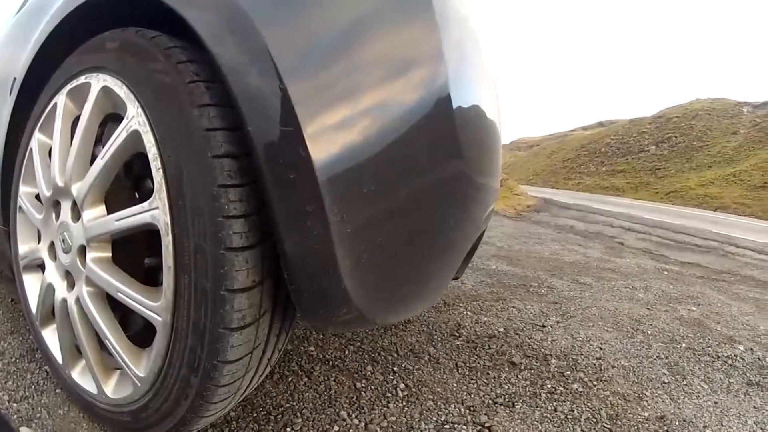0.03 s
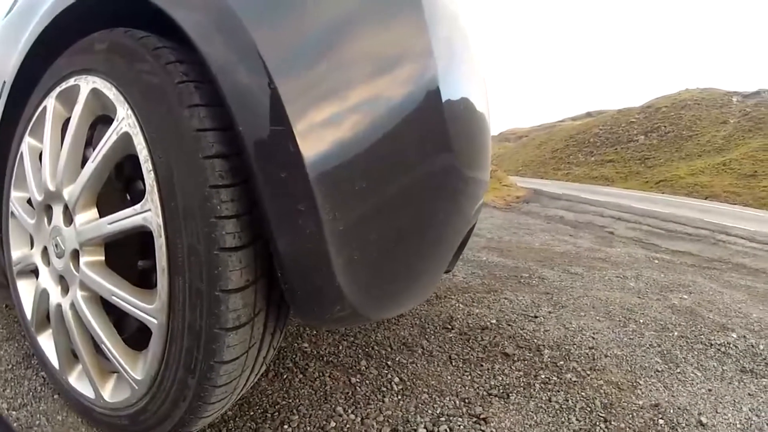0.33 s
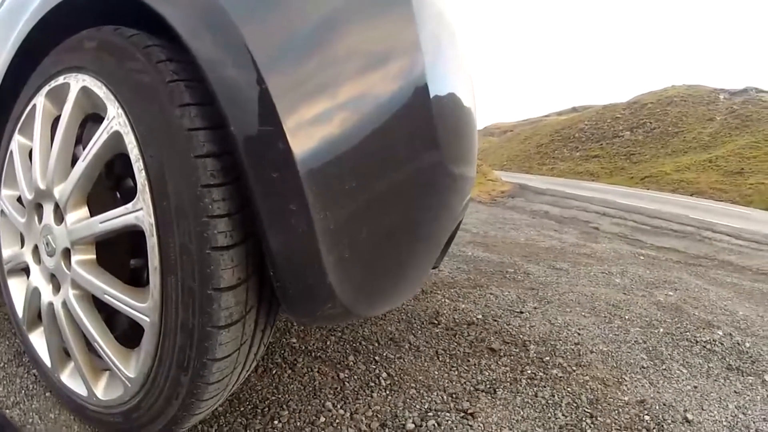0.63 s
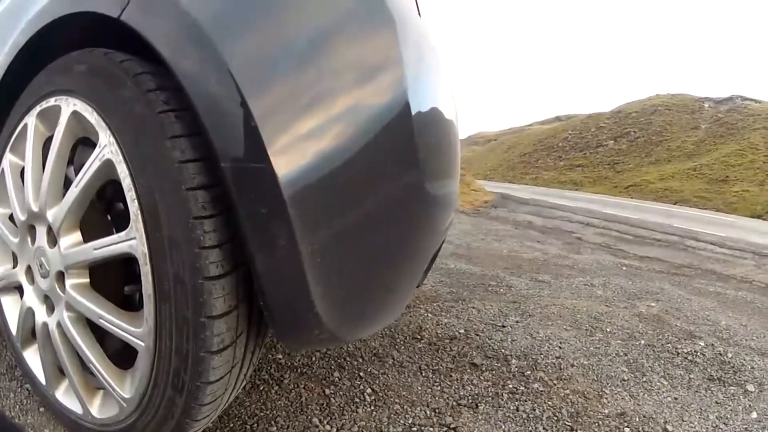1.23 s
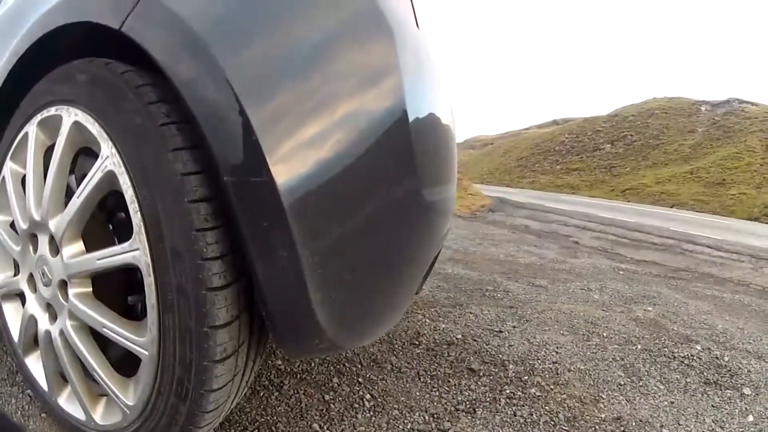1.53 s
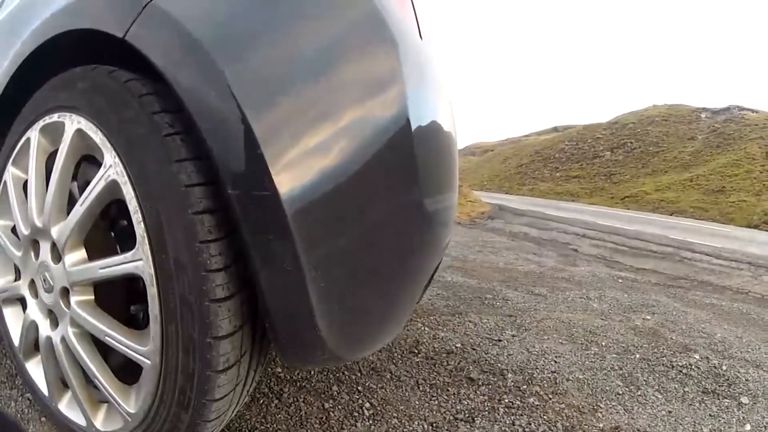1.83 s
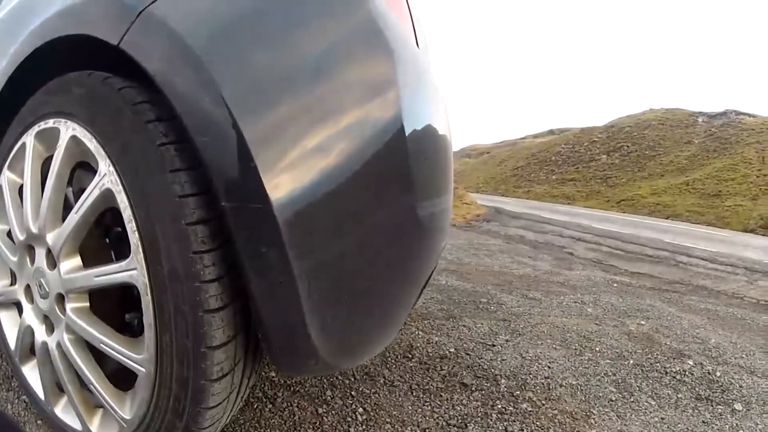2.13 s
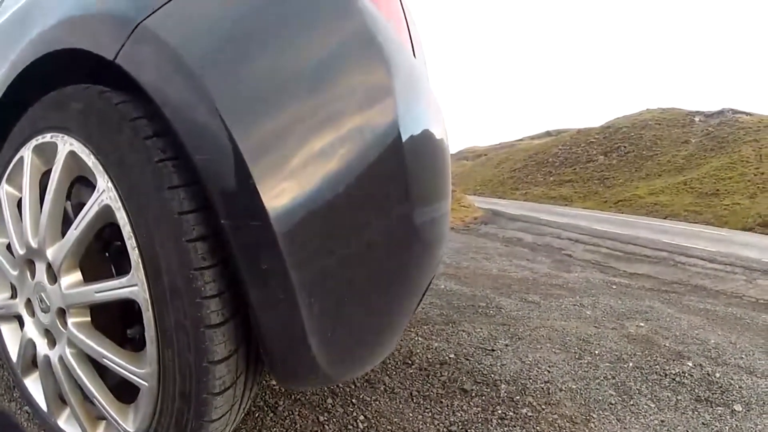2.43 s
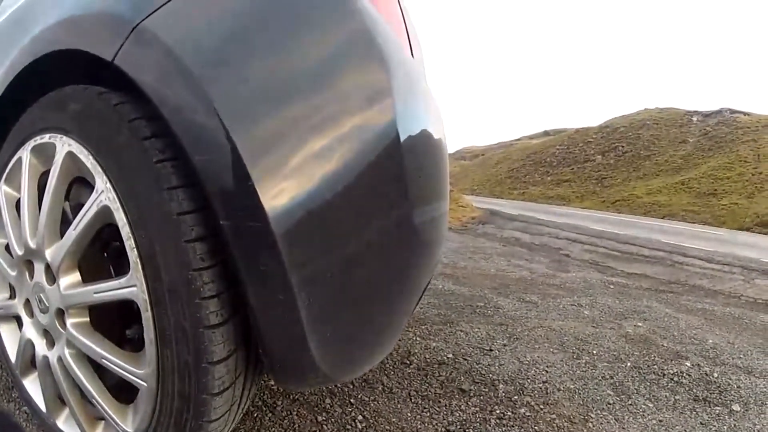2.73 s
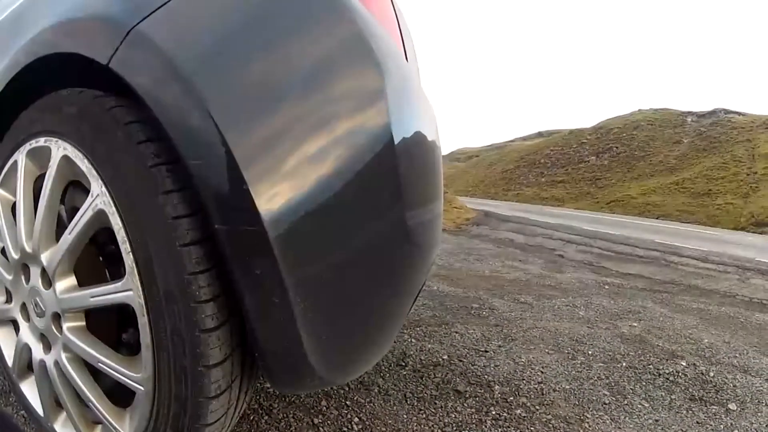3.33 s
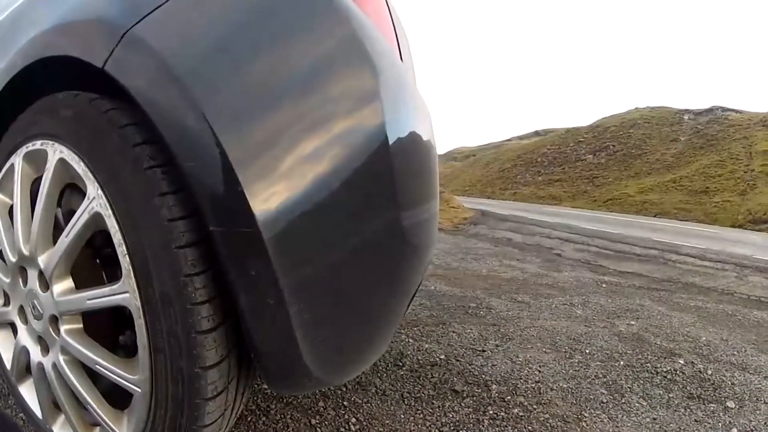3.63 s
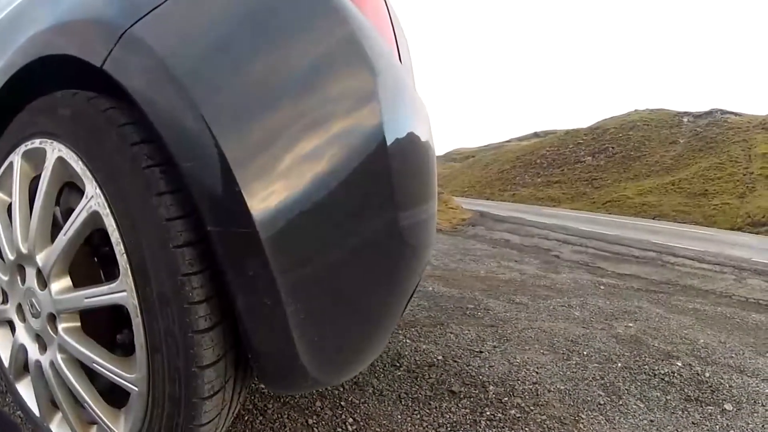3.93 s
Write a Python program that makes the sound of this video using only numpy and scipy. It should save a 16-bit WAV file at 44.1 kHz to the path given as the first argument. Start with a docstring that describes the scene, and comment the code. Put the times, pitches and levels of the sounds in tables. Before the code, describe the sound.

A car engine rumbles low and muffled, heard outdoors beside the rear wheel, with faint gravel snaps and two short handling rustles. It slows almost to idle, revs up, falls back with soft exhaust pops and starts rising again.

```python
"""A car creeps over gravel, heard from a cased camera beside its rear wheel.
The exhaust drones at the firing rate and burbles with uneven firings; something rubs the case.
Grit ticks and stones snap under the tyre, wind bumps once near 1 s, and a second rustle on the
case bites into a scrape. The engine sags almost to idle by 2.5 s, revs up to a peak at 3.25 s,
then pops softly as the throttle shuts. A last stab of throttle follows."""
import sys
import numpy as np
from scipy import signal
from scipy.fft import rfft, irfft, next_fast_len
from scipy.io import wavfile
from scipy.ndimage import uniform_filter1d, map_coordinates

SR = 44100
rng = np.random.default_rng(int(sys.argv[2]) if len(sys.argv) > 2 else 0)


def int16_out(signal):
    """Quantize to a 16-bit WAV file."""
    q = np.round(np.clip(np.atleast_2d(signal).T, -1, 1) * 32767)
    wavfile.write(sys.argv[1], SR, q.astype(np.int16))


N = 176400
TIME_S = np.arange(N) / SR


def amp(db):
    """Decibels to gain."""
    return 10 ** (np.asarray(db) / 20)


def unit(x):
    """Scale to rms 1."""
    return x / np.sqrt(np.mean(x ** 2) + 1e-20)


def gain_db(colour, hz):
    """Interpolate a colour on a log frequency axis."""
    knots_hz, knots_db = np.transpose(colour)
    return np.interp(np.log(hz + 1), np.log(knots_hz + 1), knots_db)


def curves(rows, outside=None):
    """Per-sample curve for each column after the time."""
    times_s, *columns = np.transpose(rows)
    return [np.interp(TIME_S, times_s, column, outside, outside) for column in columns]


def wobble(rate_hz):
    """Smooth random curve, rate_hz knots a second."""
    return map_coordinates(rng.standard_normal(N // 8), [TIME_S * rate_hz], mode="wrap")


def through(x, colour, size=16384):
    """Filter by a colour's minimum-phase impulse response, scaled to peak 1."""
    cepstrum = irfft(np.log(amp(gain_db(colour, np.fft.rfftfreq(size, 1 / SR)))))
    cepstrum[1:size // 2] *= 2
    cepstrum[size // 2 + 1:] = 0
    response = irfft(np.exp(rfft(cepstrum)))
    return signal.fftconvolve(x, response / np.abs(response).max())[:N]


def noise(colour):
    """Coloured noise, rms 1."""
    gain = amp(gain_db(colour, np.fft.rfftfreq(N, 1 / SR)))
    return unit(irfft(rfft(rng.standard_normal(N)) * gain, N))


def puffing(colour, cycles, depth):
    """Gas noise, one puff per firing, rms 1."""
    return unit(noise(colour) * np.exp(depth * np.cos(2 * np.pi * cycles)))


def pulses(times_s, sizes):
    """Impulses at the given times."""
    samples = np.clip(np.round(times_s * SR).astype(int), 0, N)
    return np.bincount(samples, sizes, N + 1)[:N]


def bursts(rows, decay_s):
    """Envelope of sudden onsets with exponential decay."""
    return sum(amp(db) * (TIME_S >= s) * np.exp(-np.abs(TIME_S - s) / decay_s) for s, db in rows)


def swells(rows):
    """Envelope of Gaussian swells."""
    return sum(amp(db) * np.exp(-.5 * ((TIME_S - s) / width_s) ** 2) for s, width_s, db in rows)


# hiss spectrum (frequency [Hz], gain [dB])
HISS_COLOUR = [(200, 7), (2000, -10), (5000, 0.5), (9000, -8)]


def hiss(level_db=-65):
    """Steady microphone noise."""
    return amp(level_db) * noise(HISS_COLOUR)


# stone snaps (time [s], level [dB])
STONES = [(.461, -51.5), (.525, -45.5), (.568, -47), (.633, -45.5), (.683, -55), (.851, -50.5),
          (.975, -51.5), (1.712, -47.5), (1.785, -54), (1.813, -50), (1.862, -52), (1.898, -53.5),
          (1.927, -45.5), (2.239, -47.5), (2.276, -47), (2.31, -50), (2.366, -48)]
# grit crushed by the tread (time [s], width [s], level [dB])
CRUNCHES = [(.38, 0.06, -55.5), (1.825, 0.036, -59.5), (2.26, 0.095, -62.5)]
# stone spectrum (frequency [Hz], gain [dB])
STONE_COLOUR = [(200, -4.5), (600, -1.5), (1200, 0), (1900, 3.5), (2900, -12.5), (5000, -12), (9500, -19.5)]


def gravel(ticks_per_s=41, grit_db=-74.5):
    """Under the tyre, stones snap, patches crunch and fine grit ticks."""
    snaps = bursts(STONES, decay_s=.003)
    when, size = rng.random((int(ticks_per_s * N / SR), 2)).T
    grit = unit(through(pulses(when * N / SR, size ** 2), STONE_COLOUR))
    crunch = swells(CRUNCHES) * amp(3.5 * wobble(300))
    return (snaps + crunch) * noise(STONE_COLOUR) + amp(grit_db) * grit


def friction(stroke, colour, grain_db):
    """One rubbing stroke: noise with a fast level flutter."""
    level_db, = curves(stroke, outside=-120)
    grains = rng.standard_normal(N) * amp(grain_db * wobble(600))
    return amp(level_db) * unit(through(grains, colour))


# strokes on the case (time [s], level [dB])
RUB_DB = [(0, -50), (.05, -47.5), (.17, -39), (.24, -43), (.3, -42), (.36, -71)]
BRUSH_DB = [(1.17, -68), (1.215, -45), (1.26, -50), (1.315, -49.5), (1.342, -39.5), (1.358, -52),
            (1.38, -41.5), (1.495, -52), (1.54, -81.5)]
SCRAPE_DB = [(1.324, -48), (1.34, -37), (1.351, -37), (1.358, -48), (1.366, -38.5), (1.384, -34),
             (1.41, -44), (1.452, -45.5), (1.471, -54), (1.492, -43.5), (1.53, -68)]
# stroke spectra (frequency [Hz], gain [dB])
RUB_COLOUR = [(200, -22.5), (600, -18), (1000, -13.5), (1280, -3.5), (1750, -1), (1980, 1.5), (2350, -11.5),
              (2600, -6), (3650, -14.5), (4400, -29), (9500, -17.5)]
BRUSH_COLOUR = [(200, -3), (2500, 5), (9000, -2.5)]
SCRAPE_COLOUR = [(400, -26), (1500, -19), (1760, -10), (2050, -20), (2300, 1), (2520, -8), (2770, 6.5),
                 (3150, -8), (3430, -2.5), (3800, -19.5), (7500, -16), (8400, -17.5), (9250, -3),
                 (9800, -30)]
# scrape catching and snapping free (time [s], level [dB])
CATCHES = [(1.211, -45.5), (1.231, -45), (1.297, -41), (1.339, -39), (1.374, -31), (1.383, -27)]


def case_rustle():
    """A dull rub, then a light brush that catches and bites into a scrape."""
    catches = bursts(CATCHES, decay_s=.0044) * noise(SCRAPE_COLOUR)
    rub = friction(RUB_DB, RUB_COLOUR, grain_db=2)
    brush = friction(BRUSH_DB, BRUSH_COLOUR, grain_db=2.5)
    scrape = friction(SCRAPE_DB, SCRAPE_COLOUR, grain_db=-.5)
    return rub + brush + scrape + catches


# gas and machinery noise (time [s], level [dB])
RUSH_DB = [(0, -61.5), (.45, -58.5), (1.12, -64), (1.4, -54), (1.65, -62.5), (2.25, -62), (2.6, -68),
           (2.72, -60), (2.87, -55), (3.2, -49.5), (3.4, -50.5), (3.78, -55.5), (3.97, -49.5)]
# rush spectrum (frequency [Hz], gain [dB])
RUSH_COLOUR = [(100, -15), (500, 2), (720, -1.5), (1100, -1), (2150, -1.5), (2370, 6), (2600, -3.5),
               (4200, -11), (9500, -14)]


def rush(cycles, depth=.089):
    """Gas and engine noise, swelling at each firing."""
    level_db, = curves(RUSH_DB)
    pulsing = 1 + depth * np.cos(2 * np.pi * cycles)
    return amp(level_db + .7 * wobble(40)) * unit(noise(RUSH_COLOUR) * pulsing)


# throttle stabs (time [s], width [s], level [dB])
STABS = [(2.91, .075, -56), (3.985, .045, -50)]
# spit spectrum (frequency [Hz], gain [dB])
SPIT_COLOUR = [(350, -14.5), (540, 1.5), (700, -14), (920, 0), (3000, -25)]


def tailpipe_spit(cycles):
    """On open throttle, each firing spits gas from the tailpipe."""
    return swells(STABS) * puffing(SPIT_COLOUR, cycles, depth=1.2)


# one wind bump, then exhaust pops (time [s], thud [dB], crack [dB])
THUMPS = [(1.038, -34.5, -56), (3.264, -28, -48.5), (3.292, -25.5, -47), (3.319, -29, -50),
          (3.4477, -18.5, -23.5), (3.4538, -22.5, -28.5), (3.463, -24.5, -45), (3.477, -24.5, -47),
          (3.501, -43, -37.5), (3.607, -24, -23), (3.615, -22.5, -34), (3.631, -22, -36),
          (3.727, -25.5, -48), (3.744, -28, -46)]
# thump spectra (frequency [Hz], gain [dB])
THUD_COLOUR = [(15, -31.5), (90, 8), (190, -6.5), (330, -6), (470, -15), (600, -31.5), (2000, -58)]
CRACK_COLOUR = [(80, -14.5), (250, 13), (370, 15), (700, -15), (920, 0.5), (1100, -11.5), (1300, -1.5),
                (1600, -21), (2100, -37), (5000, -49)]


def thumps():
    """Low thumps: a wind bump near 1 s, then exhaust pops as the throttle shuts; some crack."""
    times_s, thud_db, crack_db = np.transpose(THUMPS)
    thuds = through(pulses(times_s, amp(thud_db)), THUD_COLOUR)
    cracks = through(pulses(times_s, amp(crack_db)), CRACK_COLOUR)
    return -(thuds + cracks)


# pipe rumble, silencer rasp (time [s], level [dB])
RUMBLE_DB = [(0, -49), (.28, -41.5), (.5, -39.5), (.93, -48), (1.04, -43), (1.2, -47), (1.52, -49.5),
             (1.66, -46), (1.9, -47.5), (2.3, -51), (2.47, -44), (2.57, -53.5), (2.72, -43), (3.2, -50),
             (3.55, -50), (3.76, -41), (3.86, -52), (4, -49)]
RASP_DB = [(0, -64), (.2, -53.5), (.47, -44.5), (.85, -57), (1.04, -55), (1.52, -60.5), (1.68, -55.5),
           (1.9, -60.5), (2.45, -58.5), (2.56, -73), (2.68, -55), (3.15, -54), (3.3, -46.5), (3.56, -47.5),
           (3.74, -41.5), (3.85, -48.5), (4, -46.5)]
# pipe and silencer resonances (frequency [Hz], gain [dB])
PIPE_COLOUR = [(15, -9), (65, 2.5), (180, -6), (310, -13), (440, -25), (520, -32), (3000, -59.5)]
RASP_COLOUR = [(120, -22.5), (200, -6.5), (310, 6), (400, -2), (485, -6.5), (530, -31), (1000, -33.5)]


def burble(cycles, scatter_s=.0012, turbulence_db=4):
    """Uneven firings and churning gas rumble in the pipe; puffs rasp in the silencer."""
    rumble_db, = curves(RUMBLE_DB)
    rasp_db, = curves(RASP_DB)
    firings_s = np.interp(np.arange(1, int(cycles[-1])), cycles, TIME_S)
    size, lateness = rng.standard_normal((len(firings_s), 2)).T
    uneven = pulses(firings_s + scatter_s * lateness, np.tanh(size))
    lumps = unit(through(uneven, PIPE_COLOUR))
    churn = amp(turbulence_db) * noise(PIPE_COLOUR)
    rasp = puffing(RASP_COLOUR, cycles, depth=.41)
    return amp(rumble_db) * unit(lumps + churn) + amp(rasp_db) * rasp


# firing tone (time [s], level [dB])
DRONE_DB = [(0, -33), (.13, -36), (.27, -31), (.6, -32.5), (1, -32.5), (1.22, -36.5), (1.33, -32.5),
            (1.47, -37.5), (1.75, -32.5), (2.36, -31.5), (2.48, -39.5), (2.56, -46.5), (2.63, -37),
            (2.74, -27.5), (2.98, -30), (3.15, -34.5), (3.25, -58), (3.36, -32), (3.56, -34.5),
            (3.76, -29.5), (3.85, -35), (3.93, -30), (4, -30)]
# harmonics (time [s], second [dB], third [dB], base for fourth and up [dB])
HARMONICS_DB = [(0, -62, -61, -57.5), (.12, -48.5, -65, -50.5), (.33, -51.5, -55, -72),
                (.68, -55.5, -56, -55), (1.02, -42.5, -54.5, -59.5), (1.2, -49, -54.5, -60),
                (1.35, -45.5, -44.5, -58.5), (1.52, -63, -64.5, -58), (1.8, -46, -54.5, -59.5),
                (2.1, -45, -54.5, -56.5), (2.36, -40.5, -55.5, -50.5), (2.56, -52, -60.5, -62),
                (2.72, -38, -43.5, -48.5), (2.81, -44.5, -44.5, -43.5), (2.95, -31.5, -41, -42.5),
                (3.1, -41, -40, -60), (3.24, -51.5, -51.5, -64), (3.36, -37.5, -52.5, -81),
                (3.55, -47.5, -48, -69), (3.84, -50, -53, -58.5), (3.93, -35, -36.5, -60),
                (4, -44, -42.5, -54)]
# silencer response, fourth harmonic and up (frequency [Hz], gain [dB])
SILENCER_COLOUR = [(100, 1.5), (280, -4), (420, 0), (560, -9), (700, -12), (1000, -1)]


def exhaust_drone(cycles, firing_hz, fall_db=6.5, lag_rad=.57):
    """Firing tone and harmonics, each lagging the last; the silencer shapes the upper ones."""
    drone_db, = curves(DRONE_DB)
    second_db, third_db, upper_db = curves(HARMONICS_DB)
    jitter_rad = .1 * 69.5 / firing_hz  # slower running is less even
    phase = 2 * np.pi * cycles + jitter_rad * wobble(70)
    tone = amp(drone_db) * np.cos(phase)
    for k, level_db in enumerate([second_db, third_db], 2):
        tone += amp(level_db + wobble(13)) * np.cos(k * phase - lag_rad * (k - 1))
    for k in range(4, 11):
        level_db = upper_db - fall_db * (k - 4) + gain_db(SILENCER_COLOUR, k * firing_hz)
        tone += amp(level_db + 2 * wobble(14)) * np.cos(k * phase - lag_rad * (k - 1))
    return -np.sqrt(2) * tone


# engine speed (time [s], firing rate [Hz])
FIRING_HZ = [(0, 93.6), (.18, 102.2), (.32, 97.8), (.53, 90.13), (.76, 81), (.95, 75.45), (1.25, 66.6),
             (1.38, 77.7), (1.5, 82.4), (1.7, 80.2), (1.97, 71.5), (2.28, 61.06), (2.5, 54.5), (2.63, 54.7),
             (2.73, 68.03), (2.87, 100), (3, 120.3), (3.17, 143.6), (3.25, 147.6), (3.35, 140.7),
             (3.51, 132.3), (3.75, 119.8), (3.85, 117.5), (3.92, 130.2), (4, 143.5)]


def scene():
    """Mono mix; one firing cycle count keeps drone, burble, spit and rush in step."""
    firing_hz = uniform_filter1d(curves(FIRING_HZ)[0], size=1500)
    cycles = np.cumsum(firing_hz) / SR
    exhaust = exhaust_drone(cycles, firing_hz) + burble(cycles) + tailpipe_spit(cycles)
    return (exhaust + thumps() + rush(cycles) + gravel() + case_rustle() + hiss())[None]


# case response (frequency [Hz], gain [dB])
CASE_COLOUR = [(1000, 0), (1500, 0.5), (1750, 5.5), (2050, -2.5), (3250, -3.5), (3650, 6), (4200, -9.5),
               (5300, -11.5), (6000, -21), (6700, -12), (7800, -13.5), (8400, 0), (8900, -14.5),
               (9650, -14.5), (10200, -34.5)]


def record(dry):
    """The case muffles the treble and adds resonances; nothing passes above top_hz."""
    top_hz = 10200
    size = next_fast_len(N + SR // 2)
    hz = np.fft.rfftfreq(size, 1 / SR)
    gain = amp(gain_db(CASE_COLOUR, hz)) * (hz < top_hz)
    return irfft(rfft(dry, size) * gain, size)[:, :N]


dry = scene()
out = record(dry)
int16_out(out)
```